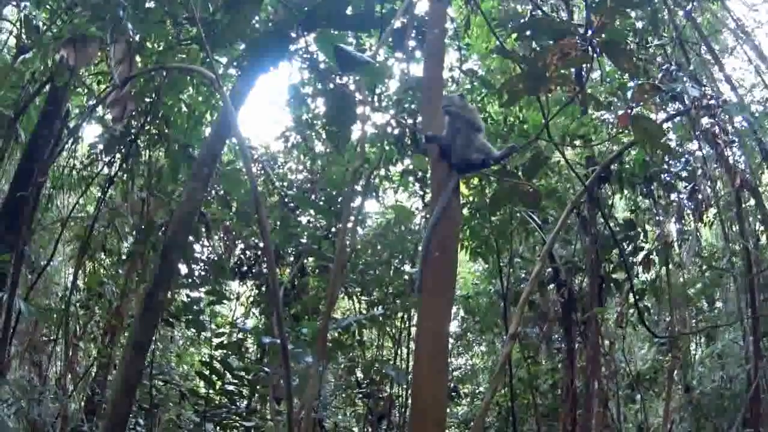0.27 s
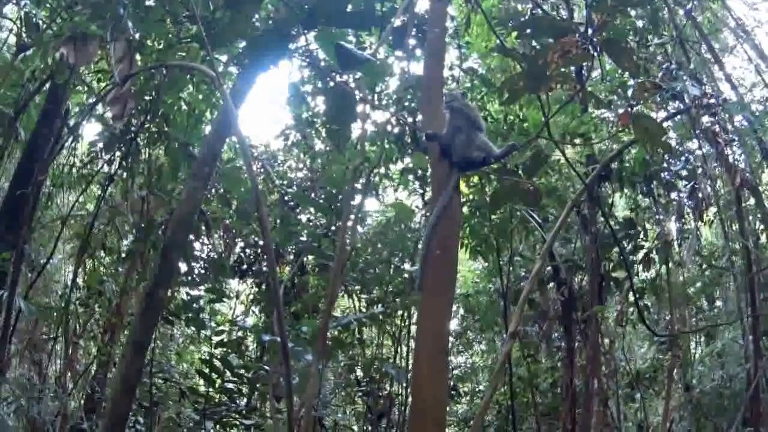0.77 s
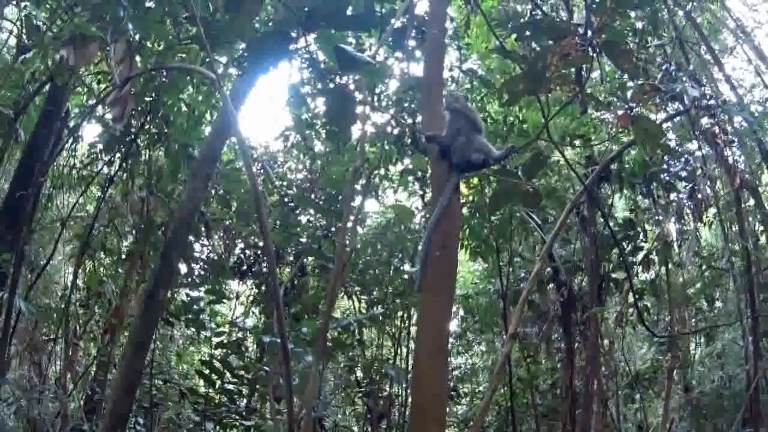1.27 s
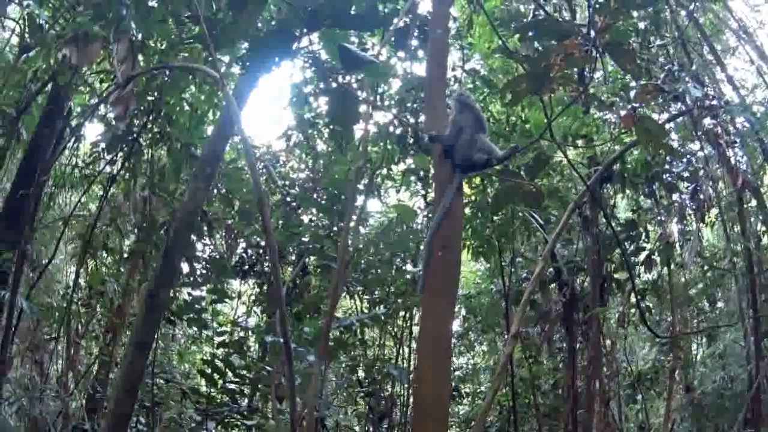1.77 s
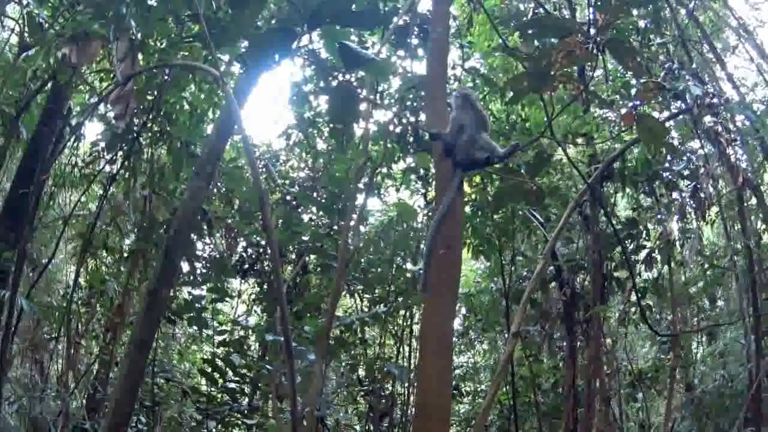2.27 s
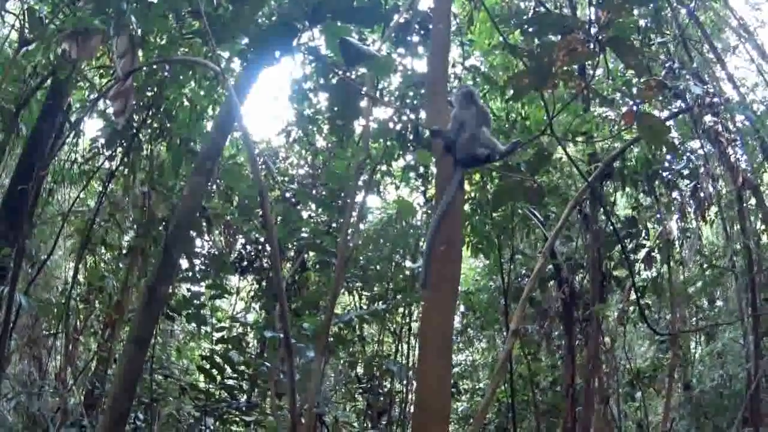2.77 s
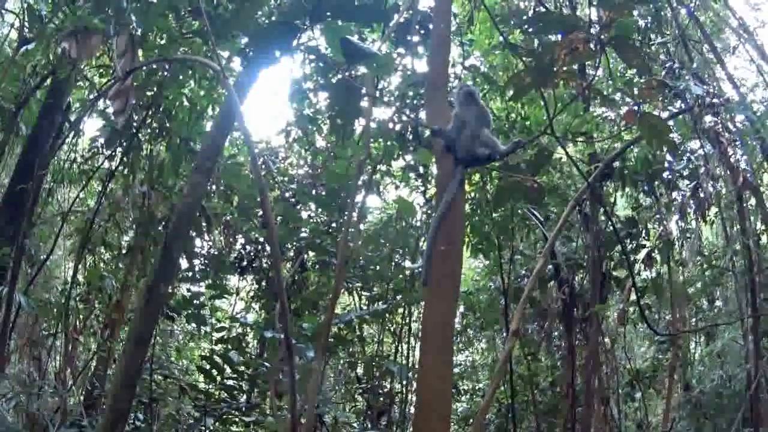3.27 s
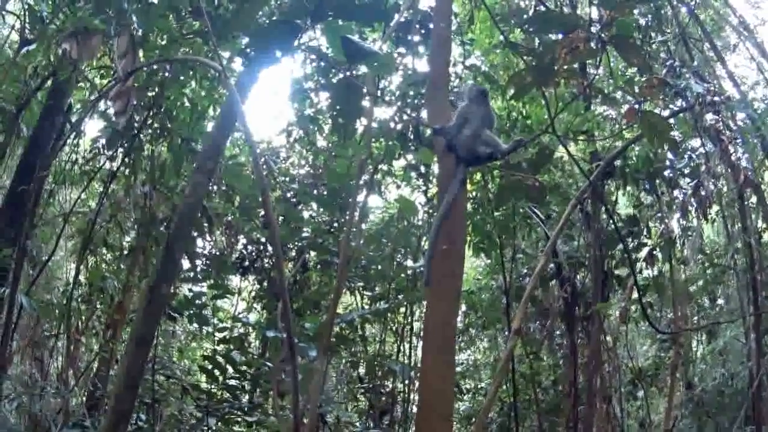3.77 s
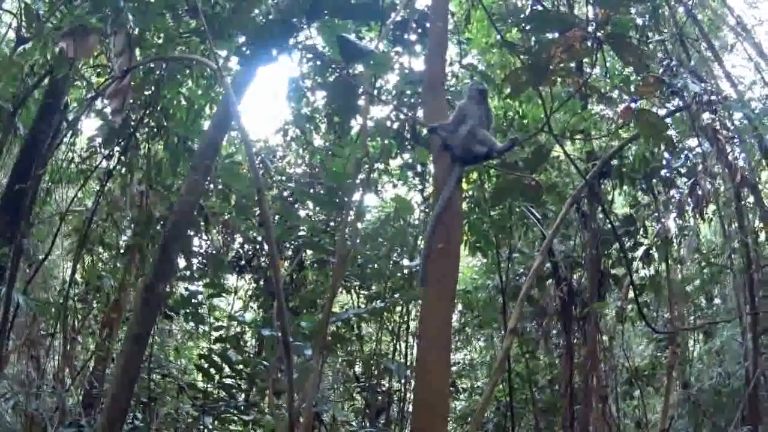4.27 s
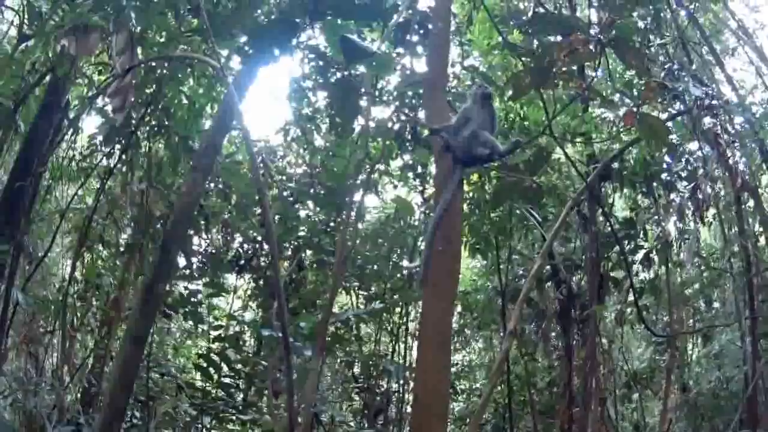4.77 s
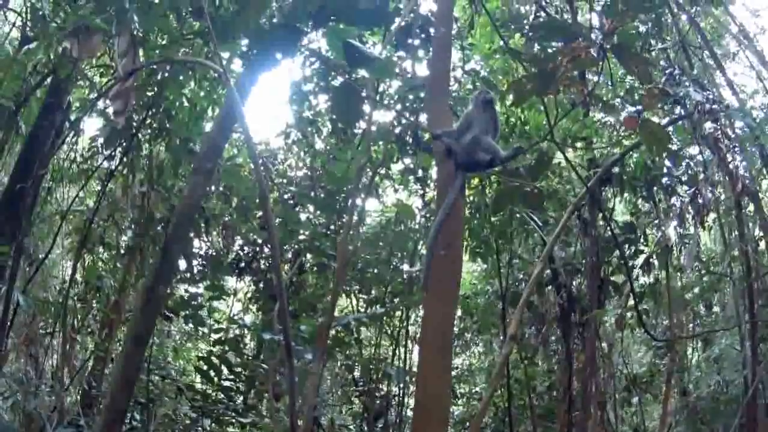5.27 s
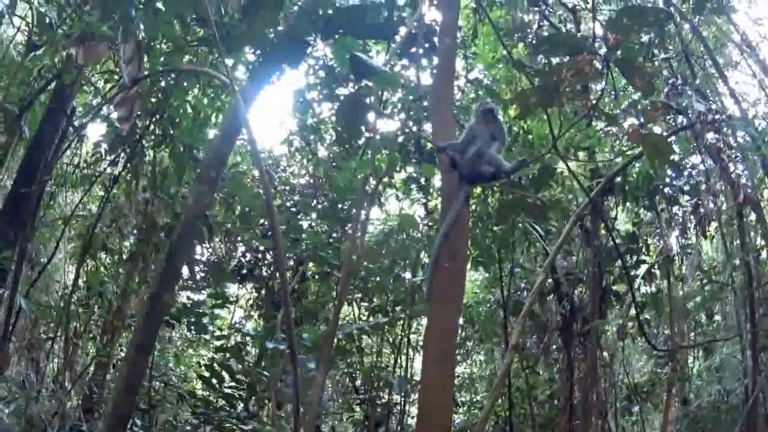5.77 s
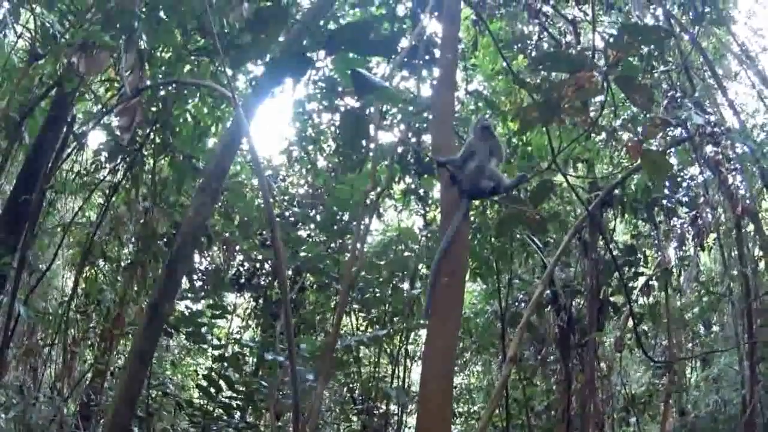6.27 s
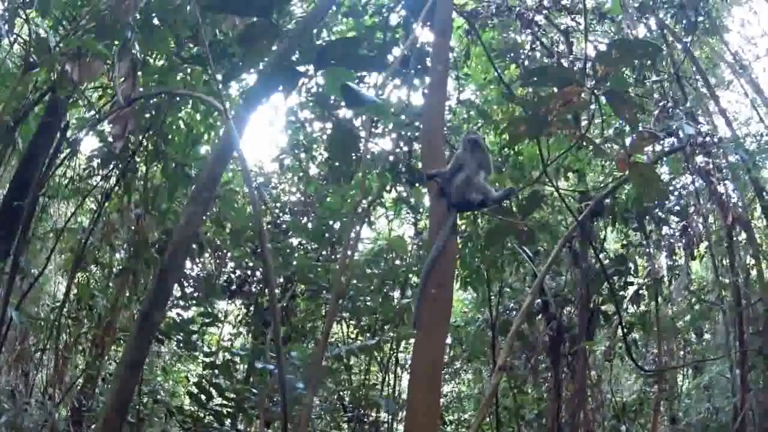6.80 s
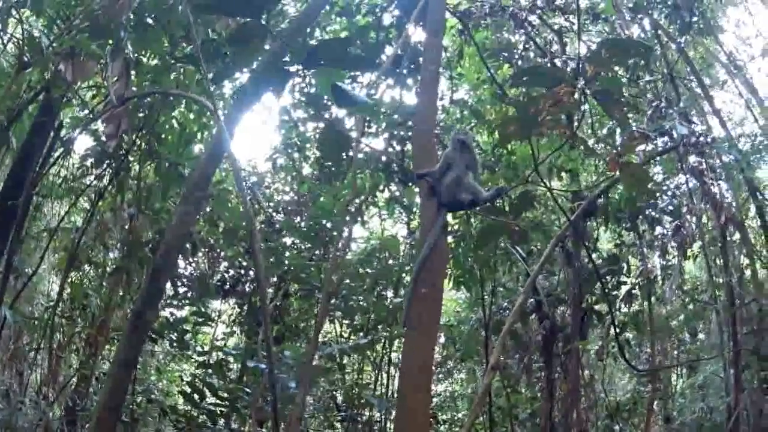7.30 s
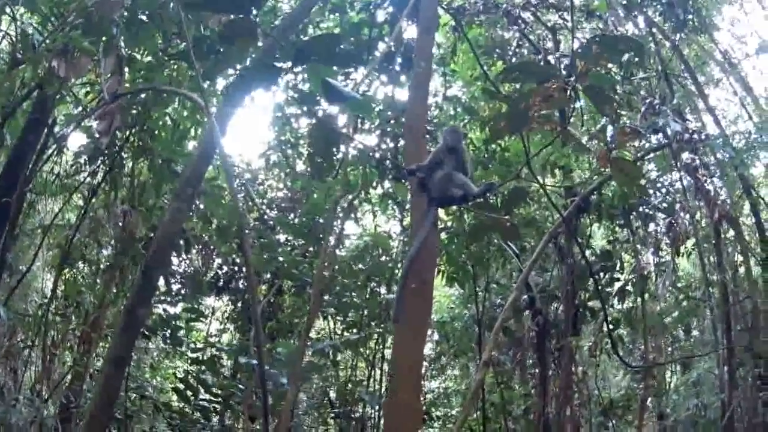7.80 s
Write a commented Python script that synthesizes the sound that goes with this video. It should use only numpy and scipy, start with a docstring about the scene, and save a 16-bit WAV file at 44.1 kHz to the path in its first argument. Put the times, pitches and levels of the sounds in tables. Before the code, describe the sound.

A steady high cicada whine and soft leafy hiss fill a forest; twigs snap, leaves rustle, and a bird whistles short rising notes.

```python
"""A tropical forest, heard through a small hand-held stereo microphone.
A bird whistles four rising notes: gliding sines. Twigs, drips and taps are short noise bursts that ring;
brushed leaves are grainy noise. Trunks scatter these sounds into a long noise tail. The hand on the housing
bumps and rumbles. Behind lie a far cicada chorus, random clicks ringing at the drum pitches, and the hiss
of the canopy, smooth coloured noise."""
import sys
import numpy as np
from scipy import signal
from scipy.fft import rfft, irfft, next_fast_len
from scipy.io import wavfile

SR = 44100
rng = np.random.default_rng(int(sys.argv[2]) if len(sys.argv) > 2 else 0)


def generate_wav(sig):
    """Save sig (samples, or channels by samples) to the path in sys.argv[1] as 16-bit PCM at SR."""
    pcm = np.round(np.clip(np.atleast_2d(sig).T, -1, 1) * 32767).astype(np.int16)
    wavfile.write(sys.argv[1], SR, pcm)


N = 354608


def amp(db):
    """Gain of a level in dB."""
    return 10 ** (np.asarray(db) / 20)


def rms_one(x):
    """Scales a sound to unit rms."""
    return x / np.sqrt(np.mean(x ** 2) + 1e-20)


def at_hz(points, hz):
    """Reads a (Hz, value) table along a log-frequency axis."""
    table_hz, values = np.transpose(points)
    return np.interp(np.log(np.maximum(hz, 1)), np.log(table_hz), values)


def drift(rate_hz):
    """Smooth random movement of spread 1: noise through two equal one-pole lowpasses at rate_hz."""
    step = 40   # computed on every 40th sample, then joined by straight lines
    r = np.exp(-2 * np.pi * rate_hz * step / SR)
    noise = rng.standard_normal(N // step + 2002)
    smooth = signal.lfilter([1], [1, -2 * r, r * r], noise)[2000:]
    return np.interp(np.arange(N) / step, np.arange(len(smooth)), rms_one(smooth))


def resonance(x, hz, width_hz):
    """Two-pole resonance with gain 1 at its peak."""
    r = np.exp(-np.pi * width_hz / SR)
    poles = [1, -2 * r * np.cos(2 * np.pi * hz / SR), r * r]
    return signal.lfilter([(1 - r * r) / 2, 0, (r * r - 1) / 2], poles, x)


def filtered(x, order, hz, kind):
    """Butterworth filter of the given kind."""
    return signal.sosfilt(signal.butter(order, hz, kind, fs=SR, output="sos"), x)


def pan(x, pan_db):
    """Two channels, left raised over right by pan_db."""
    return x * amp([[pan_db / 2], [-pan_db / 2]])


def add(out, x, start_s):
    """Mixes x into out from start_s."""
    i = round(start_s * SR)
    out[..., i:i + x.shape[-1]] += x[..., :N - i]


# how the microphone pair hears sound from all around:
# pitch_hz [Hz], likeness [0-1], right_phase [rad], left_over_right_db [dB]
PAIR = [(60, 0.97, -0.5, 2), (200, 0.91, -1, -3), (290, 0, 0, -1), (426, 0.37, -2.5, -0.5),
        (846, 0.5, -3, -0.5), (1360, 0.56, -2.5, 1), (1660, 0.5, -1.5, -3), (2000, 0.83, -2, 3),
        (2330, 0.04, -2, 5), (2880, 0.05, -7, 0.5), (4470, 0.48, -6.5, 1.7), (5500, 0.6, -8, 2),
        (6300, 0, -5.5, 0), (7380, 0.09, -8, 4), (8200, 0.17, -12.5, 0.5), (10000, 1, -11, 0)]


def all_around(one, other, closer=0.):
    """Left hears one sound; right hears it turned in phase, mixed with an unrelated one."""
    size = next_fast_len(N)
    hz = np.maximum(np.fft.rfftfreq(size, 1 / SR), 1)
    table_hz, *columns = np.transpose(PAIR)
    alike, turn, pan_db = [np.interp(np.log(hz), np.log(table_hz), c) for c in columns]
    alike = np.clip(alike + closer * (1 - alike), 0, 1)   # closer draws the two channels together
    one, other = rfft(one, size), rfft(other, size)
    right = alike * np.exp(1j * turn) * one + np.sqrt(1 - alike ** 2) * other
    return irfft([one * amp(pan_db / 2), right * amp(-pan_db / 2)], size)[:, :N]


# bird whistles: start_s [s], glide_s [s], top_fade_s [s], first_hz [Hz], top_hz [Hz],
# level_db [dB, before gain by pitch and flutter], direct_db [dB, part passing the leaves straight]
WHISTLES = [(3.745, .098, 0.03, 1400, 2087, -42, -7), (4.62, .115, 0.016, 1282, 2210, -42, -6.5),
            (6.712, .182, .012, 993, 2235, -36, -3), (7.645, .18, 0.015, 1010, 2075, -36, -2.5)]
# how strongly each whistled pitch arrives through the forest: pitch_hz [Hz], gain_db [dB]
WHISTLE_BY_PITCH = [(1000, -15), (1130, -22), (1290, -10), (1400, -20), (1530, -8.5), (1700, 0),
                    (1850, -6.5), (2050, 1.5), (2300, -2.5)]
FLUTTER_DB, FLUTTER_HZ = 2, 79   # spread and rate limit of the strength flutter
BIRD_ATTACK_S, BIRD_LAG_S = 0.01, 0.00016   # the lag is of the right port
BIRD_PAN_DB_PER_OCTAVE = 10   # left over right, even at 1600 Hz


def bird():
    """Sines glide evenly up in octaves, fluttering in strength; right lags, left gains on it with pitch."""
    near, far, t = np.zeros((2, N)), np.zeros(N), np.arange(N) / SR
    flutter = amp(FLUTTER_DB * drift(FLUTTER_HZ))
    for start_s, glide_s, top_fade_s, first_hz, top_hz, level_db, direct_db in WHISTLES:
        hz = first_hz * (top_hz / first_hz) ** np.clip((t - start_s) / glide_s, 0, 1)
        attack = (t - start_s) / BIRD_ATTACK_S
        fade = (start_s + glide_s + top_fade_s - t) / top_fade_s
        envelope = np.clip(np.minimum(attack, fade), 0, 1)
        strength = envelope * amp(level_db + at_hz(WHISTLE_BY_PITCH, hz)) * flutter
        turns = np.cumsum(hz) / SR - hz * [[0], [BIRD_LAG_S]]
        tone = strength * np.sin(2 * np.pi * turns)
        pan_db = BIRD_PAN_DB_PER_OCTAVE * np.log2(hz / 1600)
        near += amp(direct_db + np.array([pan_db, -pan_db]) / 2) * tone
        far += tone[0]   # what the forest scatters
    return near, far


# twigs, drips and taps: start_s [s], peak_db [dB, of the ring before pan], ring_hz [Hz],
# width_hz [Hz, of the first of three resonances], left_over_right_db [dB], forest_send_db [dB]
SNAPS = [(0.138, -41, 2360, 895, 8, -14), (0.35, -37.5, 3800, 2500, 5, 4.5), (.422, -43, 3500, 2500, 5, -8),
         (.467, -35, 2350, 1400, 7, 2), (0.47, -33, 2020, 910, 10, 6.5), (.4765, -33, 4580, 700, 3, -3),
         (.482, -23, 3880, 2200, 10, -16), (.487, -29, 4270, 1200, 4, -15), (.79, -38.5, 2340, 1000, 13, 5),
         (.791, -39.5, 4800, 1500, 12, -11), (.87, -44.5, 1600, 300, 4, -2),
         (1.05, -15.5, 4740, 3520, -3, -5), (1.311, -36, 3200, 3000, 7, 6),
         (1.553, -43.5, 3570, 600, 1, -10), (1.556, -45, 5600, 700, -1, 2), (1.72, -47.5, 1990, 700, 2, 6),
         (1.91, -45, 1600, 1100, -1, 9.5), (1.969, -44.5, 868, 70, -2, -19),
         (2.037, -43.5, 2170, 1500, 0, 5), (2.102, -44, 4750, 2000, 1, 4), (2.112, -38, 5000, 2500, 1, -4),
         (2.127, -38, 3500, 3500, -1, 3), (2.137, -42, 5500, 1500, 1, -1), (2.221, -37, 4640, 2500, 3, -4),
         (2.22, -43, 1820, 700, 3, -4), (2.262, -45, 4800, 1500, 1, -2), (2.919, -46.5, 377, 150, -3, -2),
         (5.994, -46, 4870, 2000, 1, 4), (6.131, -46, 2590, 1300, 2, 7), (7.162, -35, 4200, 3000, 1, 4),
         (7.17, -34, 4030, 1800, -3, 4)]
# a dry, widely ringing twig breaks at once, a narrowly ringing one tears longer
TEAR_S, TEAR_HALVED_AT_HZ = 0.0075, 1200   # longest tear; ring width that halves it
# the bright crack follows the ring's pitch
CRACK_DB, CRACK_DB_PER_OCTAVE = -1.5, 4   # crack over ring for a ring at 4000 Hz; slope with ring pitch


def snaps():
    """A short burst of breaking fibres rings at its own pitch, with a bright crack on top."""
    near, far = np.zeros((2, N)), np.zeros(N)
    age = np.arange(2500) / SR
    for start_s, peak_db, ring_hz, width_hz, pan_db, forest_send_db in SNAPS:
        tear_s = TEAR_S / (1 + (width_hz / TEAR_HALVED_AT_HZ) ** 2)
        burst = rng.standard_normal(2500) * np.exp(-2 * age / tear_s)
        burst[0] = 2.6   # the first break
        ring = resonance(burst, ring_hz, width_hz)
        ring = resonance(resonance(ring, ring_hz, width_hz * 2), ring_hz, width_hz * 2)
        crack = filtered(burst, 2, 6500, "high")
        crack_db = peak_db + CRACK_DB + CRACK_DB_PER_OCTAVE * np.log2(ring_hz / 4000)
        sound = amp(peak_db) * ring / np.abs(ring).max()
        sound = sound + amp(crack_db) * crack / np.abs(crack).max()
        add(near, pan(sound, pan_db), start_s)
        add(far, sound * amp(forest_send_db), start_s)
    return near, far


# brushed leaves: start_s [s], length_s [s], level_db [dB rms before swell, fade and pan],
# centre_hz [Hz], pan_db [dB, left over right, on top of an already fainter right]
RUSTLES = [(0.303, 0.31, -65.5, 4470, 7), (0.469, 0.042, -47, 4630, 19), (0.785, 0.11, -57.5, 3470, 4),
           (1.05, 0.038, -44.5, 7140, 4), (1.076, 0.12, -53.5, 6600, -5), (0.496, 0.11, -64, 2600, 3),
           (2.027, 0.28, -61, 2500, 2), (2.101, 0.13, -53, 5030, -5), (2.261, 0.12, -54, 4730, -3),
           (3.89, 0.093, -60, 4450, 3), (4.949, 0.056, -58.5, 4360, -1), (6.133, 0.17, -64, 3500, 1),
           (7.167, 0.11, -50.5, 3100, -5), (7.277, 0.15, -57, 5450, -6), (7.902, 0.087, -60, 3500, -3)]


def rustles(grain_db=3.0, sharpness=0.73):
    """Uneven grains of noise swell at once and fade as the leaves settle."""
    out = np.zeros((2, N))
    for start_s, length_s, level_db, centre_hz, pan_db in RUSTLES:
        grain_gain = amp(grain_db * np.repeat(rng.standard_normal(200), 80))   # a new gain every 80 samples
        grains = rng.standard_normal((2, 16000)) * grain_gain
        grains[1] = 0.47 * grains[0] + 0.3 * grains[1]   # right is partly alike, and fainter
        age = np.arange(16000) / SR / length_s
        shape = np.clip(age * 14, 0, 1) * np.exp(-2 * age ** 3.2)
        colour = resonance(grains, centre_hz, centre_hz / sharpness)
        colour = resonance(colour, centre_hz, centre_hz * 1.18)
        add(out, pan(amp(level_db) * shape * rms_one(colour), pan_db), start_s)
    return out


# bumps of the hand: start_s [s], peak_db [dB before pan], swing_hz [Hz, sets the pace of the swings]
BUMPS = [(2.917, -46, 63), (3.773, -39.5, 83.4), (3.799, -37, 127), (5.122, -42, 61.3), (5.671, -35.5, 84),
         (5.974, -51, 83.4), (6.075, -37.5, 60), (6.25, -17, 115), (6.278, -24, 84), (6.312, -25.5, 83)]
GRIP_PER_S, GRIP_DB, GRIP_HZ = 100, -52.5, 71   # faint pushes; their rms before pan; pitch setting their band
HAND_PAN_DB = -2.5   # left over right


def hand(spread_db=2.0):
    """Pushes on the housing dip, swing and slowly rebound; the trembling grip gives many faint ones."""
    bumps = np.zeros(N)
    for start_s, peak_db, swing_hz in BUMPS:
        done = np.clip(np.arange(3000) / SR * swing_hz / 1.55, 0, 1)
        done = (1 - np.exp(-1.2 * done)) / (1 - np.exp(-1.2))   # three half swings, each slower
        push = -np.sin(3 * np.pi * done) * np.sin(np.pi * done) * np.exp(-.6 * done)
        push = filtered(push, 2, 600, "low")   # soft flesh
        add(bumps, amp(peak_db) * push / np.abs(push).max(), start_s)
    sizes = amp(spread_db * np.minimum(rng.exponential(1, N), 4)) * rng.choice([-1, 1], N)
    tremor = (rng.random(N) < GRIP_PER_S / SR) * sizes
    tremor = filtered(tremor, 2, [GRIP_HZ * 0.4, GRIP_HZ * 1.56], "band")
    tremor = tremor + 1.22 * resonance(tremor, 57.7, 28)   # the housing rocks at its own pitch
    return pan(bumps + amp(GRIP_DB) * rms_one(tremor), HAND_PAN_DB)


# cicada drums: drum_hz [Hz], width_hz [Hz], level_db [dB rms before swell and pair]
CICADAS = [(7100, 140, -61), (7246, 200, -62), (7470, 225, -61), (7590, 490, -67.5), (6880, 79, -70.5),
           (10030, 180, -75.5)]


def cicadas(swell_db, clicks_per_s=2500):
    """Many unsynchronised drum clicks ring each drum pitch into a whine."""
    out = np.zeros((2, N))
    for drum_hz, width_hz, level_db in CICADAS:
        clicks = (rng.random((2, N)) < clicks_per_s / SR) * rng.standard_normal((2, N))
        # two resonances in a row narrow each other, so each is set wider
        ringing = resonance(clicks, drum_hz, width_hz * 1.56)
        ringing = resonance(ringing, drum_hz, width_hz * 1.56)
        out += amp(level_db) * rms_one(ringing)
    return amp(swell_db) * all_around(*out)


# canopy hiss before swell and pair: pitch_hz [Hz], level_db [dB per Hz]
CANOPY = [(25, -75.5), (60, -87.5), (150, -85.5), (300, -88), (560, -88), (1200, -90), (1650, -90),
          (2200, -92), (3200, -95), (4600, -96), (6300, -96), (8800, -101.5), (9600, -101.5),
          (11050, -101.5)]


def canopy(swell_db):
    """Far leaves and air: smooth coloured noise."""
    size = next_fast_len(N)
    colour = amp(at_hz(CANOPY, np.fft.rfftfreq(size, 1 / SR))) * np.sqrt(SR / 2)
    noise = rng.standard_normal((2, size))
    hiss = irfft(rfft(noise) * colour, size)[:, :N]
    return amp(swell_db) * all_around(*hiss)


# time for the forest tail to die by 60 dB: pitch_hz [Hz], decay_s [s]
FOREST_T60 = [(500, 0.81), (2000, 1.5), (4500, 1.9), (10000, 1.8)]


def forest(x, closer, rise_s, early_db, early_s=0.025):
    """Trunks and leaves scatter sound into dense noise, strongest early, dying at its own pace per band."""
    age, tail = np.arange(SR * 3 // 2) / SR, 0
    shape = (1 - np.exp(-age / rise_s)) * (1 + amp(early_db) * np.exp(-age / early_s))   # nearest trunks
    edges_hz = 280 * 2 ** np.arange(0, 6.1, .5)   # half-octave bands
    for low_hz, high_hz in zip(edges_hz, edges_hz[1:]):
        band = filtered(rng.standard_normal((2, len(age))), 2, [low_hz, high_hz], "band")
        decay_s = at_hz(FOREST_T60, np.sqrt(low_hz * high_hz))
        band = band * amp(-60 * age / decay_s) * shape
        band = band / np.sqrt(np.sum(band ** 2) / 2)
        tail = tail + band * np.sqrt((high_hz - low_hz) / (SR / 2))   # even energy per Hz
    scattered = signal.fftconvolve(x[None], tail, axes=1)[:, :N]
    return all_around(*scattered, closer=closer)


# swells of the cicada chorus: time_s [s], gain_db [dB]
SWELL = [(0, 1.5), (2, 2), (3.4, 1), (5.6, 1), (6.6, 2.5), (8.04, 1.5)]
CANOPY_SWELL_DB = -1.5   # the hiss rises and falls with the chorus, offset by this


def scene():
    """Mixes bird, twigs and leaves with their scattered tails, then hand, cicadas and canopy."""
    swell_db = np.interp(np.arange(N) / SR, *np.transpose(SWELL))
    whistle, whistle_send = bird()
    twigs, twig_send = snaps()
    leaves = rustles()
    far_tail = forest(whistle_send, closer=0.23, rise_s=0.02, early_db=3)
    near_send = twig_send + amp(-3.5) * leaves[0]
    near_tail = forest(near_send, closer=0.15, rise_s=0.0015, early_db=14.5)
    foreground = whistle + far_tail + twigs + leaves + near_tail + hand()
    return foreground + cicadas(swell_db) + canopy(swell_db + CANOPY_SWELL_DB)


PORT_HZ, PORT_WIDTH_HZ, PORT_BOOST = 4660, 630, 0.53   # boost is the gain of the added ring
CUTOFF_HZ = 11030


def record(dry):
    """The microphone port rings a little; a steep lowpass cuts the top."""
    coloured = dry + PORT_BOOST * resonance(dry, PORT_HZ, PORT_WIDTH_HZ)
    return signal.sosfilt(signal.ellip(12, .5, 70, CUTOFF_HZ, fs=SR, output="sos"), coloured)


dry = scene()
out = record(dry)
generate_wav(out)
```